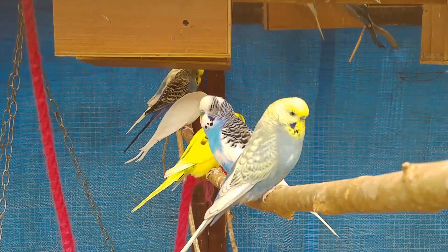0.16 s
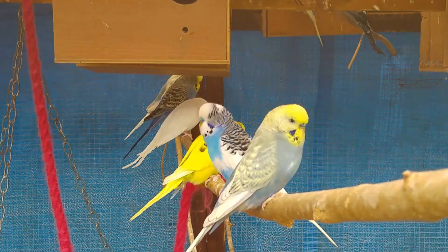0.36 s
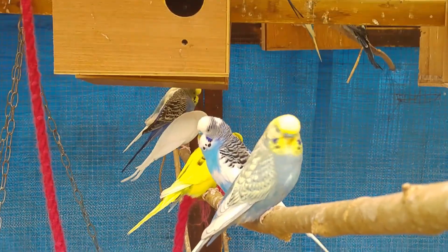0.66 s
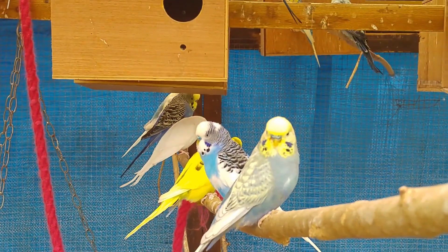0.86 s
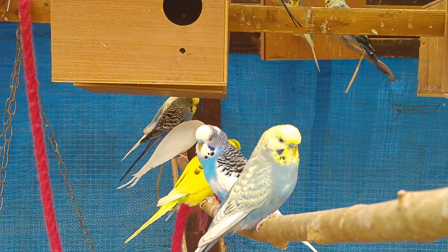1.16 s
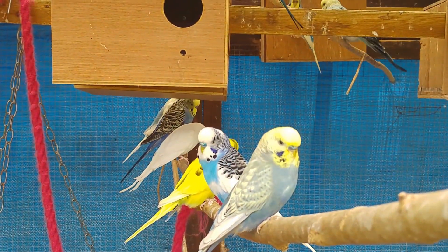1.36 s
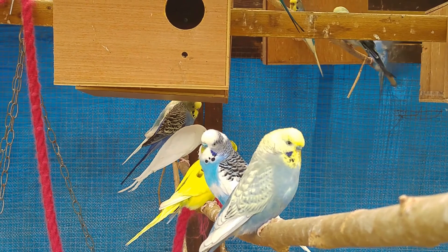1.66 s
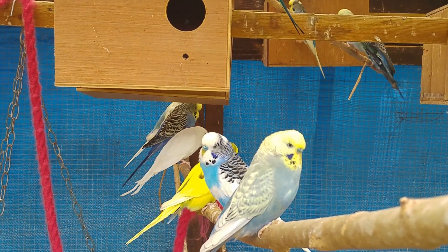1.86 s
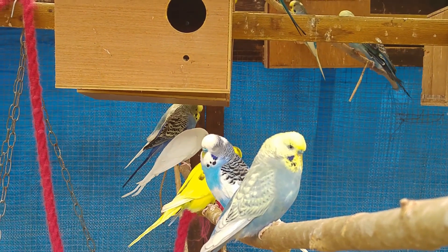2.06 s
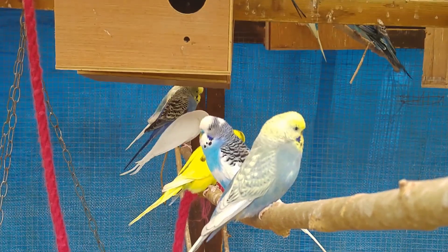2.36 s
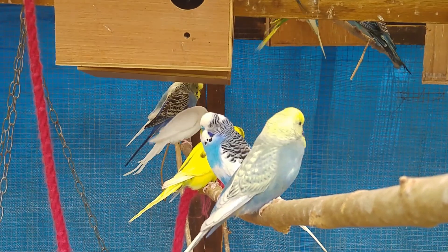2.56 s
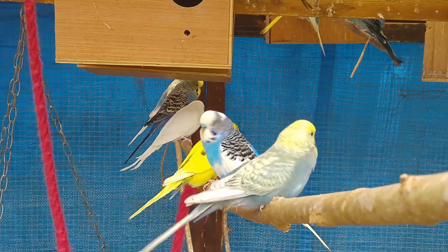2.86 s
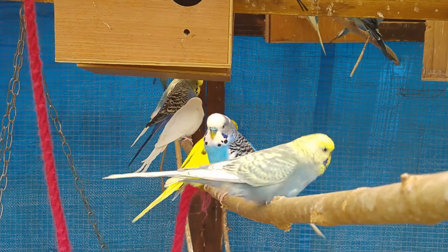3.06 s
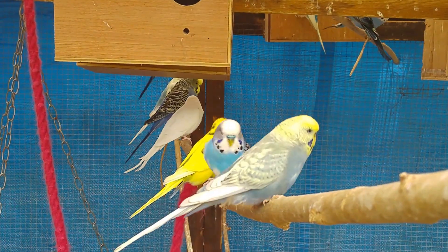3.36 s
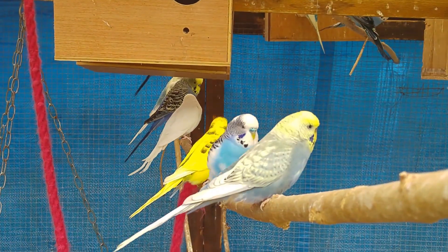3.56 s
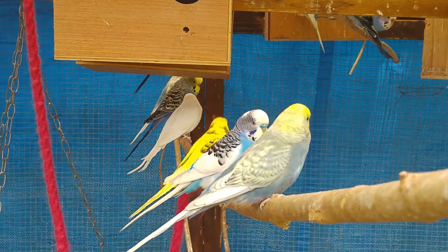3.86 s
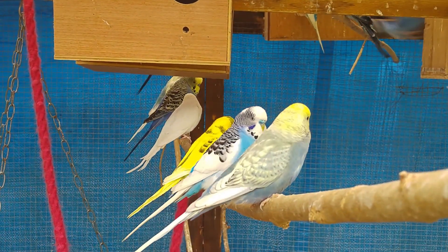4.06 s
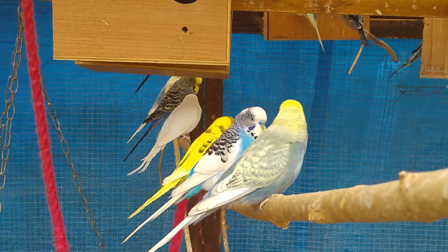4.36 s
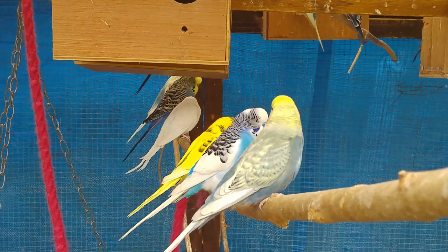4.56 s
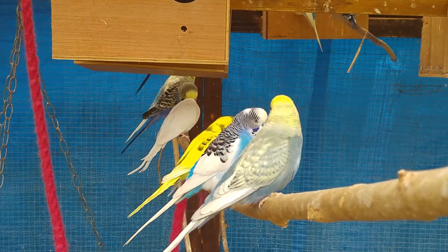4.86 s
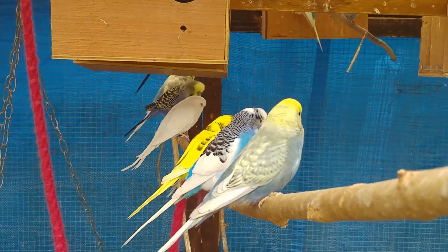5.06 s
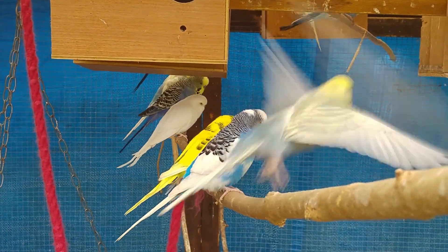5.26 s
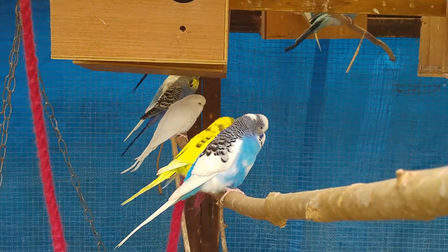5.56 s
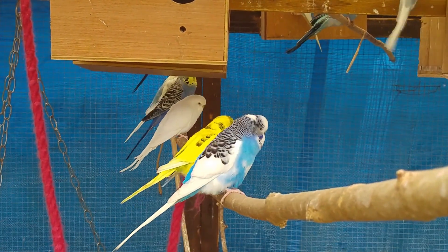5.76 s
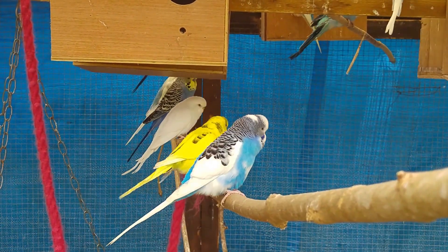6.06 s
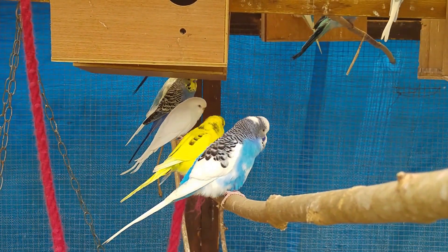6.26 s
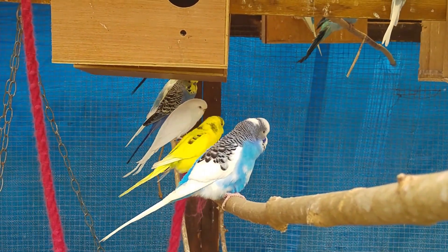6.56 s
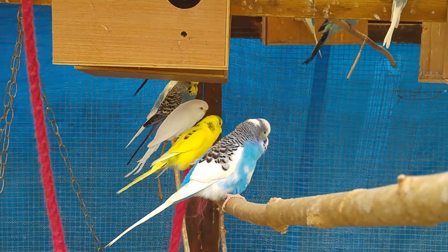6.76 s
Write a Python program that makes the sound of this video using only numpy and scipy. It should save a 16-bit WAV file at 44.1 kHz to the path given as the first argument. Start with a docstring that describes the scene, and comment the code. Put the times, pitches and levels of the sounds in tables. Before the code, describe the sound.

A dense run of short, buzzy, high-pitched parakeet squawks opens the scene, several each second, very near the microphone. After a muffled wing burst near three seconds come gaps, single scolds, a few clean chirps and little sliding whistles. Distant birds twitter and mutter most strongly around five seconds, over faint low rumble. Regular harsh squawks close it. The wooden aviary gives tight echoes and a short, light tail.

```python
"""Rasping, pulsed squawks of scolding budgerigars fill a wooden aviary, close to a small microphone.
Each squawk is a rapid train of rings and puffs of hiss; clear chirps and slides are wavering tones.
Further back a flock twitters and mutters in many short whistles, over a faint rasp.
Wings flap in bouts of pulsed noise; a low air rumble of noise swells as a bird takes off, then drops.
Wood gives quick echoes to the squawks, and the enclosure adds a short diffuse tail to all the birds."""
import sys
import numpy as np
from scipy import signal
from scipy.fft import rfft, irfft, next_fast_len
from scipy.io import wavfile
from scipy.ndimage import uniform_filter1d

SR = 44100
rng = np.random.default_rng(int(sys.argv[2]) if len(sys.argv) > 2 else 0)


def dump(signal):
    """Clip the signal to [-1, 1] and save it as 16-bit WAV at the path in sys.argv[1]."""
    limited = np.clip(np.atleast_2d(signal).T, -1, 1)
    pcm = np.round(limited * 32767).astype(np.int16)
    wavfile.write(sys.argv[1], SR, pcm)


N = 303849
TIME = np.arange(N) / SR
USUAL_HZ = 6800  # ringing pitch of an ordinary squawk

# Spectrum of the harsh hiss in a squawk. Each row: frequency in Hz, relative level in dB.
RASP = [(3800, -27), (5100, -0.5), (6200, -2.5), (7200, 3), (8600, -5.5), (9600, -11.5), (12000, -20),
        (16000, -25)]


def undb(db):
    """Decibels to gain."""
    return 10 ** (np.asarray(db) / 20)


def unit(x):
    """Scale to rms 1."""
    return x / np.sqrt(np.mean(x ** 2) + 1e-18)


def add(out, start, x):
    """Mix x into out from a start time in seconds."""
    i = min(max(int(start * SR), 0), N)
    out[i:i + len(x)] += x[:N - i]


def colour(x, points):
    """Filter x by a curve of (Hz, dB) points, joined over log frequency, and scale to rms 1."""
    hz, db = np.transpose(points)
    size = next_fast_len(len(x))
    f = np.maximum(np.fft.rfftfreq(size, 1 / SR), 1)
    gain = undb(np.interp(np.log(f), np.log(hz), db))
    return unit(irfft(rfft(x, size) * gain, size)[:len(x)])


def walk(t, rate):
    """Random values, `rate` of them a second, joined by straight lines."""
    knots = rng.standard_normal(int(t[-1] * rate) + 2)
    return np.interp(t * rate, np.arange(len(knots)), knots)


def gate(t, length, attack, release):
    """A note opens, holds for its length and dies away (all in seconds)."""
    return (1 - np.exp(-(t / attack) ** 2)) * np.exp(-np.maximum(t - length, 0) / release)


def squawks(lead=.006):
    """The near birds scold in quick succession; length, harshness and loudness set swell and throat."""
    # Each row: start in seconds, length in seconds, level in dB before the swell,
    # ringing pitch in Hz, rasp from 0 to 1.
    scolds = [(0, 0.036, -24.5, 7000, .7), (0.089, 0.097, -16.5, 6180, 0.68),
              (0.275, 0.077, -12.5, 6350, 0.63), (.395, 0.035, -12, 7020, 0.36),
              (0.442, 0.057, -13.5, 6890, .58), (0.506, 0.05, -15, 6970, 0.51),
              (0.573, 0.059, -14.5, 6980, 0.64), (0.666, 0.074, -14, 6190, .72),
              (0.776, 0.081, -17, 6940, 0.68), (0.922, 0.063, -15.5, 6870, 0.68),
              (1.049, 0.053, -14.5, 7200, 0.63), (1.173, 0.048, -12.5, 6840, 0.56),
              (1.228, 0.054, -18, 6430, 0.56), (1.305, 0.048, -13, 6830, 0.58),
              (1.407, 0.13, -13.5, 6940, 0.59), (1.559, 0.07, -13, 6790, 0.62),
              (1.664, 0.12, -15, 6650, 0.63), (1.848, 0.11, -16, 6450, 0.71),
              (2.012, 0.12, -17.5, 6280, 0.69), (2.135, .067, -17.5, 7060, 0.26),
              (2.194, 0.11, -19, 6720, 0.94), (2.325, .073, -16.5, 7310, 0.59),
              (2.435, 0.086, -12, 6850, 0.8), (2.57, 0.076, -18.5, 7140, 0.51),
              (2.629, 0.098, -14, 6720, .72), (2.797, 0.12, -12.5, 6620, 0.64),
              (2.912, 0.059, -15.5, 6700, 1), (2.995, 0.1, -19, 6950, 0.43),
              (3.051, 0.074, -12.5, 6280, .73), (3.448, 0.08, -20.5, 6790, 0.71),
              (3.839, 0.049, -18.5, 6410, 0.85), (3.954, .11, -20, 5930, 0.88),
              (4.132, 0.039, -14.5, 6840, 0.94), (4.198, 0.047, -24.5, 6650, 0.67),
              (4.451, 0.057, -12, 6890, 0.68), (5.145, 0.055, -19.5, 6770, 0.81),
              (5.309, 0.041, -15.5, 6450, 0.64), (5.425, 0.11, -17.5, 6470, .68),
              (5.666, 0.08, -12.5, 6970, 0.61), (5.897, 0.079, -21.5, 6000, 0.76),
              (6.034, 0.071, -19.5, 5840, 0.8), (6.16, 0.063, -19.5, 7240, 0.68),
              (6.268, .1, -16.5, 7630, 0.64), (6.415, .118, -19.5, 6930, 0.81),
              (6.568, 0.067, -18, 7800, 0.74), (6.742, 0.07, -18, 7970, 0.73)]
    # The first scolder faces the microphone, later ones face away.
    # Each row: time in seconds, treble boost in dB.
    facing = [(1.7, 4), (2.6, 0)]
    # Throat opening of whichever bird is scolding. Each row: time in seconds, level in dB.
    opening = [(0, -10.5), (2.6, -10.5), (3, -8), (5.3, -11.5), (6.2, -5.5)]
    usual_db, usual_rasp = -17, 0.64  # an ordinary squawk
    # growth from start to end: long, harsh squawks build, short, clear ones fade
    swell_db_per_s, swell_db_per_rasp = 62, 23
    # the throat opens for harsh squawks and tightens for loud ones
    throat_db_per_rasp, throat_db_per_db = 19, -0.38
    out = np.zeros(N)
    for start, length, db, hz, rasp in scolds:
        facing_db = np.interp(start, *np.transpose(facing))
        opening_db = np.interp(start, *np.transpose(opening))
        extra_rasp = rasp - usual_rasp
        swell_db = swell_db_per_s * length + swell_db_per_rasp * extra_rasp
        throat_db = opening_db + throat_db_per_rasp * extra_rasp + throat_db_per_db * (db - usual_db)
        voice = squawk(length + lead, swell_db, hz, throat_db, rasp, facing_db)
        add(out, start - lead, undb(db) * voice)
    return out


def squawk(length, swell_db, hz, throat_db, rasp, facing_db, pulse_hz=183, jitter=.14, chirp=0.14,
           scatter_db=3.5, fall=0.0703, arch_db=7):
    """The syrinx snaps open nearly 200 times a second; each opening is a rising ring and a puff of hiss."""
    # Spectrum of the puffs through the throat. Each row: frequency in Hz, relative level in dB.
    throat_shape = [(900, -67), (1400, -17), (2100, -6), (3000, -1.5), (4000, 5), (4800, 3.5), (5800, -29)]
    clearing = 0.16  # rasp lost from start to end
    snap = 3  # exponent: higher opens the syrinx more briefly in each cycle
    pipe_hz, pipe_q, pipe_db = 2150, 6, -16.5  # windpipe resonance of a squawk at the usual pitch
    t = np.arange(int((length + .08) * SR)) / SR
    progress = np.minimum(t / length, 1) - .5
    rasp = np.clip(rasp - clearing * progress, 0, .95)

    cycle = np.cumsum(pulse_hz * (1 + jitter * walk(t, 113.3))) / SR % 1
    pulse = np.abs(np.sin(np.pi * cycle ** 0.74)) ** snap * undb(scatter_db * walk(t, 206.5))
    # in a harsh squawk the membranes never quite close, so the pulses run together
    flow = unit(unit(pulse) + 6.6 * rasp ** 4)

    roughness = rasp * (.09 * walk(t, 70) + 0.1012 * walk(t, 2000))
    pitch = hz * (1 - fall * progress + chirp * (cycle - .5) + roughness)
    phase = 2 * np.pi * np.cumsum(pitch) / SR
    # the ring is the second harmonic; an open throat lets the fundamental out as well
    ring = unit(np.sin(phase) * flow)
    fundamental = unit(np.sin(phase / 2) * flow)

    # a tight throat and a beak that points this way sharpen the hiss above the ring
    edge_db = facing_db - 0.32 * (throat_db + 6.5)
    edged = [(f, db + edge_db * np.clip(2 * np.log2(f / hz), 0, 1)) for f, db in RASP]
    hiss = colour(rng.standard_normal(len(t)) * flow, edged)
    throat = colour(rng.standard_normal(len(t)) * flow, throat_shape)
    # a low resonance of the windpipe colours the puffs as well
    resonance = signal.iirpeak(pipe_hz * hz / USUAL_HZ, pipe_q, fs=SR)
    pipe = unit(signal.lfilter(*resonance, rng.standard_normal(len(t)) * flow))
    low_voice = unit(throat + 0.34 * fundamental + undb(pipe_db) * pipe)
    voice = np.sqrt(1 - rasp ** 2) * ring + rasp * hiss + undb(throat_db) * low_voice

    # harsh squawks build and ebb; clear ones start at once
    arch = arch_db * rasp * (np.cos(np.pi * progress) - np.pi / 4)
    effort = undb(swell_db * progress + arch)
    return boards(voice * effort * gate(t, length, attack=0.0085, release=0.0084))


def boards(x, echo_db=-4, reach=.0055, count=7):
    """Every squawk has its own quick echoes off the wood, within a few milliseconds, which comb the sound."""
    response = np.zeros(int(reach * SR) + 2)
    places = rng.integers(2, len(response), count)
    response[places] = rng.choice([-1, 1], count) * undb(echo_db) / np.sqrt(count)
    response[0] = 1
    return signal.fftconvolve(x, response / np.linalg.norm(response))


def whistles():
    """Clear contact chirps and soft slides, each a single voice with weak overtones."""
    # Contact chirps. Each row: start in seconds, length in seconds, number of arches, level in dB.
    contact_calls = [(4.087, 0.082, 3, -17), (4.522, 0.047, 1, -14), (5.003, .058, 2, -20),
                     (5.41, 0.039, 1, -21), (5.959, 0.0543, 2, -21)]
    # Soft slides. Each row: start in seconds, length in seconds, first pitch in Hz,
    # last pitch in Hz, level in dB.
    slides = [(.228, 0.057, 4920, 3750, -32), (1.013, 0.033, 2600, 2620, -36),
              (1.637, 0.066, 1900, 1560, -43), (3.587, 0.07, 5040, 4950, -38.5),
              (4.709, 0.072, 6150, 6350, -32), (4.778, 0.014, 2190, 2250, -27),
              (4.823, 0.16, 1240, 822, -37.5), (5.11, .06, 1727, 1353, -36),
              (5.373, 0.036, 817, 1130, -30.5), (5.591, .075, 3620, 3050, -34.5),
              (5.667, 0.036, 1400, 1626, -31.5)]
    out = np.zeros(N)
    for start, length, arches, db in contact_calls:
        add(out, start, undb(db) * chirp(length, arches))
    for start, length, first_hz, last_hz, db in slides:
        middle_hz = np.sqrt(first_hz * last_hz)
        add(out, start, undb(db) * whistle(length, [first_hz, middle_hz, last_hz]))
    return out


def chirp(length, arches, waver_hz=60, second_db=-23, dip_db=9):
    """One tone bounces through quick arches in pitch and swells towards the top of each."""
    foot_hz, top_hz = 2766, 3150  # before the waver
    t = np.arange(int((length + .025) * SR)) / SR
    height = np.abs(np.sin(np.pi * max(round(arches), 1) * np.minimum(t / length, 1)))
    pitch = foot_hz + (top_hz - foot_hz) * height + waver_hz * (walk(t, 348) + walk(t, 99))
    phase = 2 * np.pi * np.cumsum(pitch) / SR
    tone = sum(undb(second_db * np.log2(k)) * np.sin(k * phase) for k in range(1, 4))
    swelling = unit(tone * undb(dip_db * height + 2.9 * walk(t, 168)))
    return swelling * gate(t, length, attack=0.0046, release=.007)


def whistle(length, pitches, waver_hz=45, second_db=-20, droop=4):
    """A tone curves through three pitches (Hz), wavers and droops as the note dies."""
    t = np.arange(int((length + .025) * SR)) / SR
    arch = np.polyval(np.polyfit([0, .5, 1], pitches, 2), np.minimum(t / length, 1))
    drooping = arch * np.exp(-droop * np.maximum(t - length, 0))
    pitch = drooping + waver_hz * (walk(t, 350) + walk(t, 100))
    phase = 2 * np.pi * np.cumsum(pitch) / SR
    tone = sum(undb(second_db * np.log2(k)) * np.sin(k * phase) for k in range(1, 4))
    return unit(tone) * undb(4.2 * walk(t, 163)) * gate(t, length, attack=0.0031, release=0.0096)


def wings(beat_hz=17, depth_db=5):
    """Each wingbeat pushes a puff of air and rustles the feathers: noise pulsed at an uneven beat."""
    # Bouts of flapping and wing shuffling. Each row: start in seconds, end in seconds, level in dB.
    flights = [(0.848, 1.43, -46.5), (1.95, 2.864, -47), (2.859, 2.993, -25.5), (3.059, 3.97, -40),
               (4.052, 4.331, -36.5), (5.3, 5.81, -44.5)]
    # Spectrum of the wing noise. Each row: frequency in Hz, relative level in dB.
    wing_shape = [(25, -19), (55, 1.5), (120, -3.5), (210, -8), (410, 1.5), (520, -9.5), (900, -8.5),
                  (1400, -33.5), (14000, -33)]
    out = np.zeros(N)
    for start, end, db in flights:
        t = np.arange(int((end - start + 0.6) * SR)) / SR
        phase = 2 * np.pi * np.cumsum(beat_hz * (1 + 0.12 * walk(t, 9.0))) / SR
        beats = undb(depth_db * np.sin(phase))
        puffs = colour(rng.standard_normal(len(t)) * beats, wing_shape)
        add(out, start, undb(db) * puffs * gate(t, end - start, attack=0.022, release=0.074))
    return out


def flock():
    """Birds further back twitter in bouts, mutter low notes and rasp faintly."""
    # Bouts of excited twitter. Each row: start in seconds, length in seconds,
    # level in dB ahead of the twitter and rasp trims.
    bouts = [(0, 0.26, -34), (4, 0.64, -32.5), (4.901, 0.16, -22), (5.34, 0.21, -23)]
    # Level of the low warble, which rises and subsides. Each row: time in seconds, level in dB.
    warble_curve = [(0, -68), (3.7, -49.5), (4.35, -35.5), (4.62, -52.5), (4.97, -30.5), (5.3, -39),
                    (6.89, -76.5)]
    excitement = undb(-33)  # steady twitter under the bouts
    for start, length, db in bouts:
        since = np.maximum(TIME - start, 0)
        excitement = excitement + undb(db) * gate(since, length, attack=.04, release=0.058)
    warble_db = np.interp(TIME, *np.transpose(warble_curve))
    twitter = warble(centre_hz=3114, spread=.33, waver_hz=198.8, count=460)
    mutter = warble(centre_hz=1330, spread=0.42, waver_hz=44.8, count=420)
    flicker = undb(6.0 * walk(TIME, 22) + 3.5 * walk(TIME, 300))
    rasps = colour(rng.standard_normal(N) * flicker, RASP)
    return excitement * (undb(-6.5) * twitter + undb(-7.5) * rasps) + undb(warble_db) * mutter


def warble(centre_hz, spread, waver_hz, count):
    """Short notes, near and far by level alone, slide at random round one register in a strong tail."""
    out = np.zeros(N)
    notes = rng.uniform(-1, 1, (count, 6))
    for k, (when, length, register, bend, slide, near) in enumerate(notes):
        pitches = centre_hz * np.exp(spread * register + 0.2084 * np.array([slide, bend / 2, -slide]))
        start = (k + .5 + when / 2) / count * N / SR
        add(out, start, undb(4.7 * near) * whistle(.02 * 2 ** length, pitches, waver_hz))
    return unit(aviary(out, tail_db=-2))


def aviary(x, tail_db, t60=0.2):
    """The enclosure adds a short diffuse tail, duller than the direct sound, falling 60 dB in t60 seconds."""
    t = np.arange(SR // 2) / SR
    tail = uniform_filter1d(rng.standard_normal(len(t)), size=3) * np.exp(-np.log(1000) * t / t60)
    response = undb(tail_db) * tail / np.linalg.norm(tail)
    response[0] = 1  # direct sound
    return signal.fftconvolve(x, response / np.linalg.norm(response))[:N]


def scene():
    """All the birds in their enclosure, over a low air rumble that swells as a bird takes off, then drops."""
    # Level of the low air rumble. Each row: time in seconds, level in dB.
    rumble_level = [(0, -54), (3.3, -47.5), (4.8, -45.5), (5.5, -38.5), (6.3, -47.5)]
    # Spectrum of the rumble. Each row: frequency in Hz, relative level in dB.
    rumble_shape = [(25, -13), (58, 4), (130, -4.5), (300, -10), (3000, -21.5), (15000, -43)]
    birds = squawks() + whistles() + flock() + wings()
    rumble_db = np.interp(TIME, *np.transpose(rumble_level)) + 1.9 * walk(TIME, 3.984)
    rumble = colour(rng.standard_normal(N), rumble_shape) * undb(rumble_db)
    return (aviary(birds, tail_db=-16.5) + rumble)[None]


def record(dry):
    """The microphone hollows a few narrow bands, rounds the highest peaks and cuts the top."""
    # Hollows in the microphone's response. Each row: centre in Hz, width in Hz, depth from 0 to 1.
    hollows = [(582, 94, 1), (1903, 180, 0.3), (2451, 186, 0.8), (7820, 350, 0.63)]
    top_hz = 15850
    for hz, width_hz, depth in hollows:
        band = signal.lfilter(*signal.iirpeak(hz, hz / width_hz, fs=SR), dry)
        dry = dry - min(depth, 1) * band
    rounded = dry / (1 + dry ** 6) ** (1 / 6)
    return signal.sosfilt(signal.ellip(10, .2, 80, top_hz, fs=SR, output="sos"), rounded)


dry = scene()
out = record(dry)
dump(out)
```